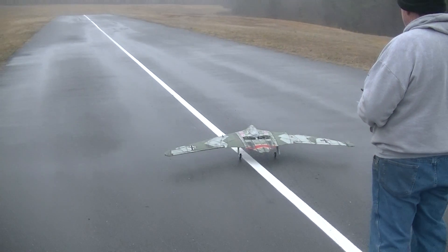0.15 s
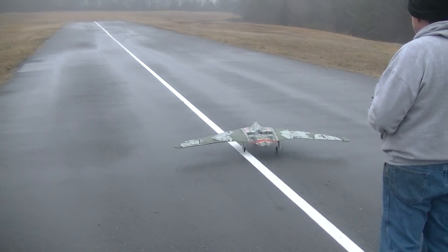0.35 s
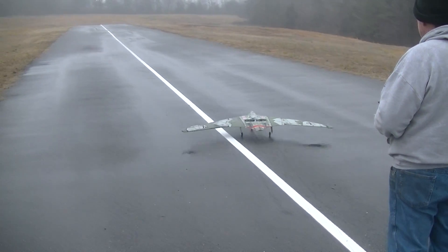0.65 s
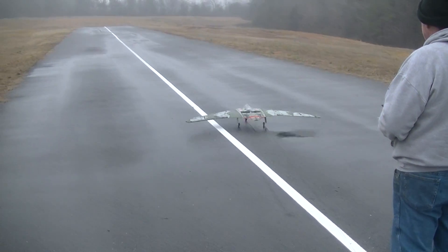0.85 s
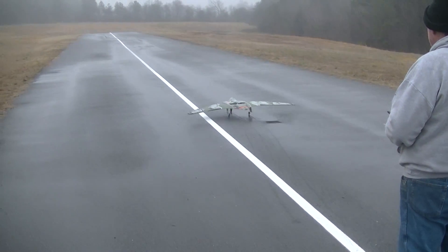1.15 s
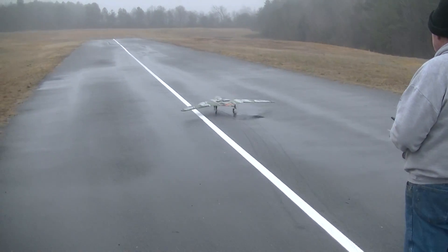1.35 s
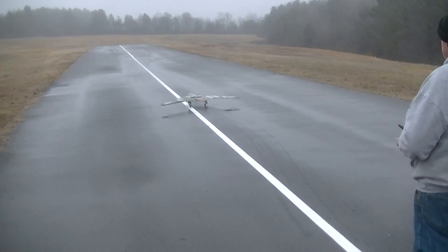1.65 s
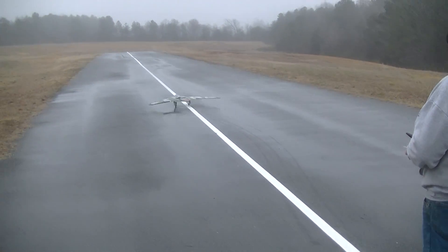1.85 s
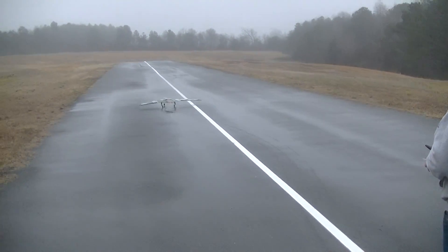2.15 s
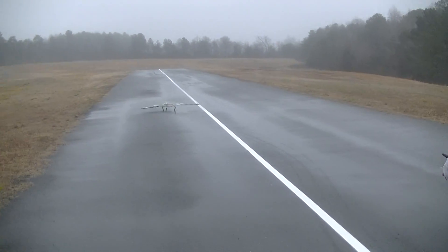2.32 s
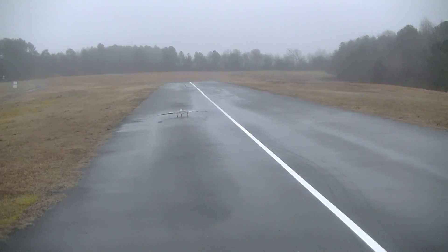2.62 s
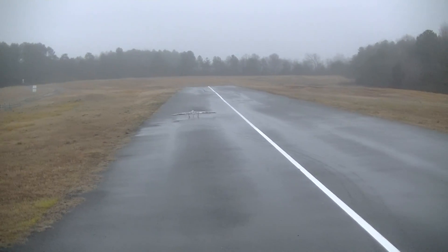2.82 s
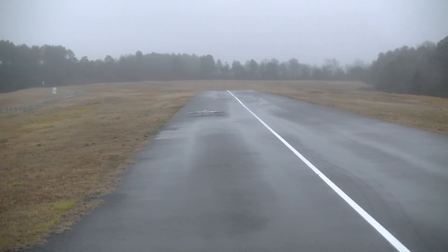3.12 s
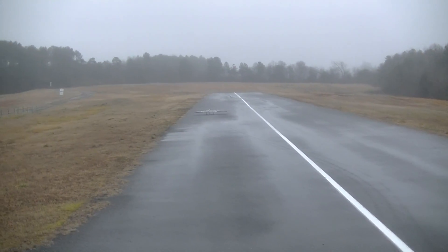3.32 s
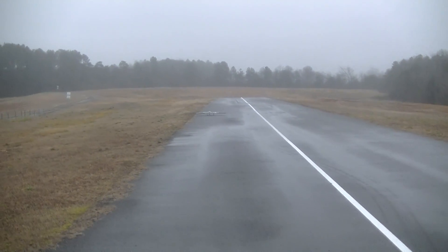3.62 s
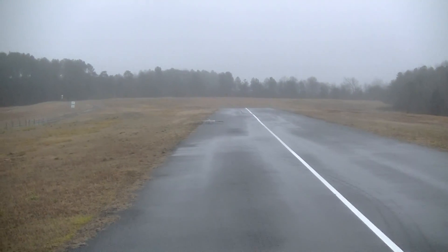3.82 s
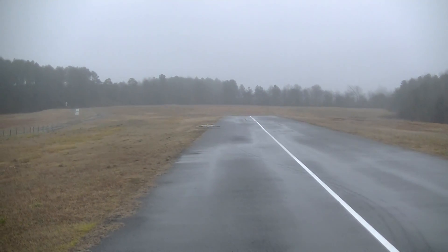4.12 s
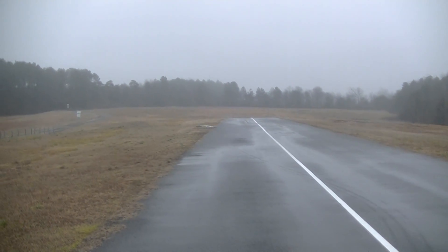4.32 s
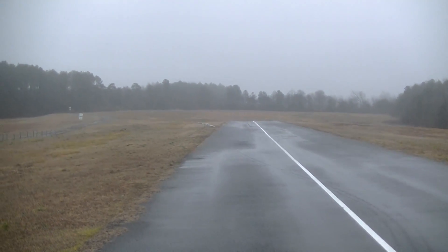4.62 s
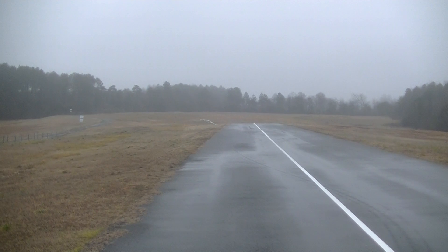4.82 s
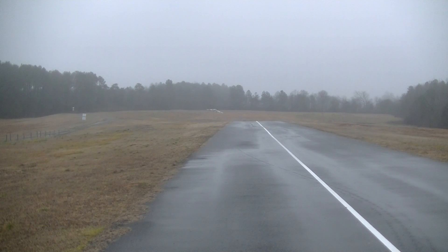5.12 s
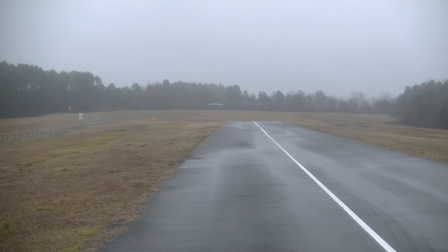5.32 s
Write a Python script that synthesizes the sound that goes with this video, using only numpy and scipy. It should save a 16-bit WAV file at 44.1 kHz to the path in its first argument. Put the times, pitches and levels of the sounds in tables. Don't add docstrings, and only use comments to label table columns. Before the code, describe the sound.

Shrill electric fan whine with rushing air jumps up in pitch, steadies, dulls and recedes across a quiet open field, ending after a tiny crack.

```python
import sys
import numpy as np
from scipy import signal
from scipy.fft import rfft, irfft, next_fast_len
from scipy.io import wavfile
from scipy.ndimage import uniform_filter1d, map_coordinates

SR = 44100
rng = np.random.default_rng(int(sys.argv[2]) if len(sys.argv) > 2 else 0)


def invert_db(level):
    return 10 ** (np.asarray(level, dtype=float) / 20)


def waveform_to_disk(signal):
    frames = np.transpose(np.atleast_2d(signal))
    scaled = np.clip(frames, -1, 1) * 32767
    samples = np.round(scaled).astype(np.int16)
    wavfile.write(sys.argv[1], SR, samples)


N = 240913
STEP = 16

# time in seconds, shaft turns in Hz.
SHAFT_HZ = [(0, 203.4), (.13, 207.5), (.7, 207.8), (.76, 219.7), (.83, 225.4), (.9, 223.6), (1.01, 209.8),
            (1.09, 214), (1.14, 218.8), (1.22, 240.5), (1.3, 244.6), (1.4, 239), (1.51, 252.7),
            (1.6, 253.7), (2.1, 251.8), (3, 247.9), (4, 246.4), (5.46, 244.8)]
# time in seconds, carry in dB, bass lost to ground echo in dB,
# treble lost to air and heading in dB.
PATH_DB = [(0, -22.5, 22, 9.5), (.3, -25, 18.5, 4.5), (.6, -30, 14.5, -1.5), (.9, -29.5, 7.5, 1),
           (1.05, -25.5, 14, 9), (1.5, -26.5, 9, 7), (1.7, -27.5, 8, 7), (2.1, -25.5, 11, 7),
           (2.4, -25.5, 13, 11), (2.7, -28.5, 12, 17), (3, -33.5, 9.5, 22.5), (3.4, -39.5, 4.5, 20),
           (3.75, -37.5, 5.5, 16), (4.05, -33.5, 12, 18), (4.5, -40, 10.5, 17), (4.8, -37, 15.5, 18),
           (5.1, -29, 27, 23), (5.46, -38, 12.5, 17)]
PATH_CORNERS_HZ = [1170, 2670, 9900]
# shaft multiple, level in dB.
NEAR_ORDERS_DB = [(1, -25.5), (2, -59.5), (3, -24.5), (4, -9), (5, -37), (6, -28), (7, -26), (8, -7),
                  (9, -41), (10, -18), (11, -25), (12, -10.5), (13, -2.5), (14, -4), (15, -10), (16, -9),
                  (17, -37.5), (18, -15), (19, -10.5), (20, -7.5), (21, -12), (22, -22), (23, -34),
                  (24, -7), (25, -32), (26, -7), (27, -16), (28, -3), (29, -25), (30, -11.5)]
# shaft multiple, level in dB.
FAR_ORDERS_DB = [(1, -24.5), (2, -34.5), (3, -42), (4, -15), (5, -55), (6, -22), (7, -34), (8, 0), (9, -29),
                 (10, -16.5), (11, -25), (12, -9.5), (13, -44), (14, -26), (15, -29), (16, -9), (17, -44),
                 (18, -34), (19, -18.5), (20, -11), (21, -41), (22, -25.5), (23, -30), (24, -12), (25, -37),
                 (26, -25.5), (27, -47), (28, -21), (29, -28), (30, -23)]
# shaft multiple, near level in dB, far level in dB.
UPPER_ORDERS_DB = [(32, -11, -30), (34, -24, -40), (36, -22, -34), (38, -28, -46), (40, -19, -36),
                   (42, -17, -43), (44, -18, -36), (46, -27, -48), (48, -29, -42), (50, -32, -50),
                   (52, -20, -45), (54, -27, -52), (56, -21, -50), (60, -30, -52)]
# shaft multiple, near level in dB, far
# level in dB.
MAGNET_BEATS_DB = [(3.5, -60, -24.5), (19.5, -17, -27), (58, -27, -54)]
# time in seconds, share of the far pattern (0-1),
# smear by turbulent air (ratio), extra haze on the high orders (ratio).
TURNING = [(0, 0, .26, 0), (.7, .1, .32, .05), (1.2, .5, .5, .15), (1.6, 1, .5, 0), (2.5, 1, .6, 0),
           (3, 1, .65, .2), (3.5, 1, .7, .6), (4.5, 1, .95, .7), (5.46, 1, 1.2, .7)]
# time in seconds, blade pass in dB, its 2nd harmonic in dB.
BLADE_LOAD_DB = [(0, -32, -35), (.3, -38, -35), (.6, -50, -42.5), (.7, -44, -34.5), (.77, -24.5, -36.5),
                 (.92, -26, -34.5), (1.04, -37, -30.5), (1.16, -26.5, -36.5), (1.3, -33, -30.5),
                 (1.5, -33, -23.5), (2.1, -41, -20.5), (2.4, -39, -20), (2.8, -37, -22.5),
                 (3.06, -39, -28.5), (3.5, -39.5, -35), (4.1, -38.5, -30.5), (4.45, -40, -39.5),
                 (5.2, -39.5, -30.5)]
# time in seconds, shaft multiple, change in
# dB, half length in seconds.
SINGING_DB = [(0.12, 14, 5, 0.11), (0.198, 20, 2, 0.078), (0.84, 28, 4, 0.056), (0.98, 20, 6.5, 0.14),
              (5.38, 16, -8, 0.14), (1.59, 16, -6, 0.12), (2.14, 16, 1.5, 0.43), (1.49, 12, 5.5, 0.1),
              (2.47, 24, 2.5, 0.33), (0.98, 42, -12, .2), (1.3, 56, -15, .2), (3.85, 20, -6, 0.35),
              (0.86, 24, 8, .09), (1.172, 24, 13, 0.02), (1.16, 16, 12, 0.068), (1.23, 20, 6, 0.087),
              (1.32, 16, -2.5, 0.17), (1.424, 24, 6.5, 0.05), (1.41, 20, 9.5, 0.08), (2, 20, -6.5, 0.4),
              (2.683, 16, 3.5, 0.19), (1.4, 8, -5.5, 0.02), (4.4, 1, -2.5, 0.98), (3.5, 16, -4, 0.3),
              (4.096, 16, -5, 0.078), (4.93, 16, 5.5, 0.33), (5.397, 20, 1, 0.071), (1.35, 22, 15, 0.22),
              (1.4, 18, 6, .15), (0.92, 32, -12, 0.18), (0.89, 44, -17, 0.23), (2.3, 32, 11, 0.39),
              (1.9, 10, 5.5, 0.54), (1.16, 15, 9.5, 0.16), (.25, 11, 13, 0.25), (5.38, 12, -4, 0.087),
              (5.31, 8, -3.5, 0.036), (2.8, 14, 8, 0.31), (0.53, 16, 8, 0.14), (1, 27, -8, .3),
              (0.58, 19, -10, 0.24), (.78, 18, -11, .1), (1.95, 28, 7.5, 0.43), (3, 12, 2, 0.086),
              (1.8, 12, -12, 0.048), (2.7, 16, 1, 0.078), (4.9, 1, -16, .12), (1.65, 1, 2.5, 0.43),
              (4.6, 4, -8, 0.018),
              (.975, 19.5, 17, .055), (1.02, 19, -8, .1), (1.0, 28, -4, .1), (1.57, 12, -3, .17),
               (.12, 13, -3, .15), (2.0, 16, 2, .3), (1.85, 20, 3, .3), (1.1, 52, 4, .1), (1.25, 32, 5, .1),
               (1.03, 20, -7, .06), (1.0, 24, 4, .025), (1.07, 24, 6, .03), (1.125, 24, 6, .02),
               (1.2, 24, -6, .014), (1.235, 24, 4, .025), (1.31, 24, 5, .035), (1.2, 20, -7, .016),
               (1.28, 20, -6, .01), (1.41, 20, -6, .012), (.8, 52, 4, .1), (.8, 40, 4, .08),
               (1.3, 44, 3, .15), (1.0, 48, 4, .3), (.12, 12, -4, .12), (.02, 14, 3, .04), (4.95, 6, 5, .5),
               (3.4, 6, 2, .5), (2.1, 52, 4, .7), (2.1, 56, 5, .7), (.55, 38, -6, .3)]
# frequency in Hz, density in dB per Hz.
ROAR_DB = [(100, -42), (200, -69), (375, -24.5), (950, -8), (1120, -5), (1300, -10.5), (1500, -4.5),
           (1760, -13.5), (2090, -0.5), (2300, -6.5), (3070, -10), (4270, -8), (6070, -7), (7000, -15),
           (9000, -20.5), (12000, -27.5), (15800, -28.5)]
# time in seconds, change in dB, half length in seconds.
GUSTS_DB = [(0.006, 1, 0.0091), (0.12, 1.5, 0.0082), (0.164, -1, 0.0068), (0.2, 2, 0.015),
            (0.242, -0.4, 0.028), (0.54, 0, 0.01), (0.651, 2.5, 0.0076), (0.66, -1.1, 0.05),
            (0.707, -2, 0.0074), (0.755, -0.3, 0.035), (0.852, -1.5, 0.016), (0.993, 2.5, 0.016),
            (1.034, -2.5, 0.016), (1.098, -2, 0.01), (1.126, 2, 0.007), (1.138, 2, 0.021),
            (1.17, 3, 0.0098), (1.188, -1.5, 0.012), (1.24, 2.5, 0.031), (1.295, 4.5, 0.0068),
            (1.32, 0, 0.016), (1.348, -2.5, 0.0064), (1.394, -1, 0.016), (1.434, 4, 0.0082),
            (1.487, 0.5, 0.011), (1.544, -2, 0.044), (1.642, -5, 0.0058), (1.743, 0, 0.0068),
            (1.787, 2.5, 0.023), (1.85, 3.5, 0.019), (1.89, -2.5, 0.007), (1.906, 1.5, 0.007),
            (1.91, -4, 0.024), (1.923, -2, 0.007), (1.945, 2.5, 0.007), (1.984, 1, 0.0083),
            (2.035, -0.5, 0.024), (2.133, -3, 0.033), (2.175, -4.5, 0.0067), (2.196, 1.2, 0.0069),
            (2.244, 2.5, 0.0072), (2.27, -3, 0.013), (2.328, 4.5, 0.0045), (2.362, -5.5, 0.014),
            (2.434, -1, 0.0073), (2.45, 3, 0.0072), (2.483, -2, 0.007), (2.53, 2.2, 0.012),
            (2.569, -3.5, 0.005), (2.596, 4, 0.005), (2.629, -4.5, 0.0047), (2.661, -3, 0.0065),
            (2.677, 1, 0.007), (2.729, 1.5, 0.041), (2.766, 1, 0.0064), (2.828, -2.5, 0.025),
            (2.869, -4, 0.0092), (2.905, -2, 0.0064), (2.94, -2, 0.0068), (3.028, 1.5, 0.007),
                (3.055, -5.5, 0.01), (3.087, -2, 0.0069), (3.205, 1.5, 0.035), (3.298, 2.5, 0.054),
                (3.301, -3, 0.0064), (3.334, 4.5, 0.0064), (3.374, -4, 0.007), (3.386, 5.5, 0.009),
                (3.426, 2.5, 0.016), (3.457, 0, 0.0068), (3.495, -3, 0.038), (3.493, 6, 0.0071),
                (3.81, -3, 0.007), (3.897, 4.5, 0.0067), (3.965, 2.5, 0.04), (4.063, 3.5, 0.0069),
                (4.094, 6.5, 0.0058), (4.102, -5, 0.0068), (4.186, 7.5, 0.006), (4.228, -1.0, 0.054),
                (4.302, -2.5, 0.0067), (4.325, 2, 0.016), (4.411, 0.5, 0.008), (4.468, -0.5, 0.021),
                (4.511, 3, 0.007), (4.576, 3, 0.006), (4.737, 5.5, 0.0059), (4.754, -3, 0.05),
                (4.816, -2, 0.0056), (4.87, 1.7, 0.007), (4.948, 1.7, 0.035), (5.1, 4, 0.0063),
                (5.136, 5, 0.0077), (5.147, -5, 0.0067), (5.188, 5.5, 0.0071), (5.207, -0.5, 0.05),
                (5.226, 1.5, 0.011), (5.26, 1.5, 0.016), (5.345, 0.5, 0.019), (5.392, -4, 0.007)]
# time in seconds, share (ratio).
FLUTTER_SHARE = [(0, .55), (1, .6), (1.15, 1.35), (1.6, 1.15), (2.8, 1.1), (3.2, .9), (5.46, .9)]
# time in seconds, half length in seconds, frequency in Hz, change in dB.
EDDIES_DB = [(0.51, 0.35, 860, 6), (1.95, .15, 1040, 1), (4.7, 0.14, 1200, 2), (4, .4, 4020, 1),
             (2.34, 0.22, 5100, -1.5), (0.398, 0.29, 1100, -3), (0.72, 0.47, 5100, 5),
             (1.32, 0.17, 13000, 3.5), (1.625, 0.14, 5700, 5), (2.011, 0.04, 6200, 2.5),
             (2.898, 0.14, 12900, 6.5), (3.703, 0.057, 9500, 6.5), (4.932, .1, 9500, 7),
             (4.7, 0.12, 1560, -5.5), (1.308, 0.082, 5350, 5), (2.43, 0.21, 11300, 9),
             (2.85, 0.053, 4800, 2), (3.5, 0.043, 5525, -5.5), (3.745, 0.12, 5170, 2),
             (4.353, 0.044, 5120, 8), (4.95, 0.19, 5440, 7.5), (5.222, 0.053, 2500, 4),
             (5.226, 0.087, 5200, -7.5), (5.42, 0.098, 5000, 8.5)]
# time in seconds, peak in dB, ring in Hz, t60 in seconds.
STRIKE_RINGS = [(5.2619, -18, 5500, .004), (5.2627, -1.5, 5900, .003), (5.2628, -8, 4500, .004),
                (5.2627, -14, 3500, .008), (5.2629, -10, 2350, .018), (5.2655, -8, 2450, .009),
                (5.2643, -13, 3350, .012), (5.2650, -25, 650, .04), (5.2660, -10, 6200, .005),
                (5.2651, -9, 1400, .01), (5.2645, -22, 870, .04), (5.2705, -23, 2300, .03),
                (5.2730, -23, 950, .02), (5.2790, -28, 780, .03), (5.2645, -33, 450, .015),
                (5.2760, -39, 480, .07), (5.2670, -45, 250, .07), (5.2815, -27, 2700, .012)]
# time in seconds, hum in Hz, level in dB.
TYRE_HUM = [(0, 101, -112), (2.7, 114.4, -84), (3.15, 120.2, -72), (3.6, 139.3, -75), (4, 150, -63),
            (4.32, 162.4, -67), (4.4, 169.7, -93.5), (5.46, 168.7, -99)]
# frequency in Hz, density in dB per Hz.
FIELD_DB = [(13, -41), (22, -19), (140, -10.5), (240, -6), (318, -7.5), (401, -10.5), (491, -3), (900, 0),
            (1170, -38), (1980, -120)]
# frequency in Hz, width in Hz, gain in dB.
PEAKS_GAPS_DB = [(3705, 303, -6), (3984, 120, 3), (4360, 76, -4.5), (4570, 420, 1), (5930, 390, 2),
                 (7890, 88, -23), (8840, 150, 3), (10000, 380, -4), (10930, 1680, 6), (8400, 56, -15),
                 (9600, 60, -8), (12250, 80, -9), (15200, 170, -17)]
# frequency in Hz, density in dB per Hz.
HISS_DB = [(3000, -26), (6500, 3), (8000, -3), (11000, -4), (13000, -15), (15800, -10)]
# frequency in Hz, left over right in dB.
LEFT_DB = [(60, 0), (210, .8), (500, 1), (1170, 2), (1790, 6), (2740, 7), (4190, 8.3), (6410, 4),
           (9810, 4.6), (15000, 4.3)]
# frequency in Hz, lead of the left port in radians.
LEAD_RAD = [(60, .1), (500, .3), (1460, .5), (3100, .45), (3700, .9), (4310, .4), (6720, .3), (7400, 1.2),
            (8440, .7), (9560, .4), (10700, .7), (15500, .7)]
# frequency in Hz, left-right correlation (-1 to 1).
ALIKE = [(60, .96), (200, .99), (1000, .99), (4000, .97), (7000, .93), (10000, .9), (14000, .87)]

FOURTH_NEAR_DB, FOURTH_FAR_DB = -2.5, -12
UPPER_DB, UPPER_FAR_DB = 1, 1
LISTED_GUSTS, SMALL_GUSTS = 0.93, 0.45
EDDY_OCTAVES = 0.44
STUMBLE_S, SAG_HZ, RECOVER_S = 5.266, 15, .06
DIP_DB, DIP_S, BLADE_DIP_S = 7.5, .028, .042


def unit(x):
    return x / np.sqrt(np.mean(np.abs(x) ** 2) + 1e-20)


def along(points, hz):
    point_hz, value = np.transpose(points)
    return np.interp(np.log(hz + 1), np.log(point_hz + 1), value)


def curves(rows, t):
    row_s, *columns = np.transpose(rows)
    return np.array([np.interp(t, row_s, column) for column in columns])


def wobble(rate_hz):
    knots = rng.standard_normal(int(N * 600 / SR) + 4)
    place = np.arange(0, N, STEP) * min(rate_hz, 600) / SR
    return unit(map_coordinates(knots, [place], order=2))


def filtered(x, response):
    size = next_fast_len(N + SR // 4)
    return irfft(rfft(x, size) * response(np.fft.rfftfreq(size, 1 / SR)), size)[..., :N]


def bump(x, centre, half):
    return np.exp(-((x - centre) / half) ** 2)


def stumble(t, recover_s):
    return (t > STUMBLE_S) * bump(t, STUMBLE_S, recover_s)


def field():
    murmur = lambda hz: invert_db(along(FIELD_DB, hz)) / (1 + (30 / (hz + 1)) ** 4)
    return invert_db(-53.0) * unit(filtered(rng.standard_normal((2, N)), murmur))


def wheels(t):
    clock_s = np.arange(N) / SR
    hz, db = curves(TYRE_HUM, clock_s)
    uneven_db = np.interp(clock_s, t, 2.4 * wobble(14))
    return invert_db(db + 1.5 + uneven_db) * np.sin(2 * np.pi * np.cumsum(hz) / SR)


def strike():
    out, t = np.zeros(N + SR), np.arange(SR // 10) / SR
    for start_s, peak_db, hz, t60_s in STRIKE_RINGS:
        ring = np.sin(2 * np.pi * hz * t) + 0.43 * np.diff(rng.standard_normal(len(t) + 1))
        onset = 1 - np.exp(-t / .0001)
        out[round(start_s * SR):][:len(t)] += invert_db(peak_db - 60 * t / t60_s) * ring * onset
    return filtered(out[:N], lambda hz: 1 / (1 + (170 / (hz + 1)) ** 6) / (1 + (hz / 6900) ** 4))


def path_db(t, hz):
    carry_db, bass_db, treble_db = curves(PATH_DB, t)
    low_hz, middle_hz, top_hz = PATH_CORNERS_HZ
    lows = np.clip(np.log(middle_hz / (hz + 1)) / np.log(middle_hz / low_hz), 0, 1)
    highs = np.clip((hz - middle_hz) / (top_hz - middle_hz), 0, 1)
    air_db = -1.5 * t * np.clip(hz / top_hz - 1, 0, 1)
    octave = np.log2(hz + 1)
    focus_db = sum(db * bump(t, at_s, half_s) * bump(octave, np.log2(at_hz), EDDY_OCTAVES)
                   for at_s, half_s, at_hz, db in EDDIES_DB)
    dip_db = DIP_DB * stumble(t, DIP_S) * (1 - .8 * lows + 1.3 * highs)
    return carry_db - bass_db * lows - treble_db * highs + air_db + focus_db - dip_db


def gusts(t):
    db = 1.7 * wobble(70) + 1.4 * wobble(110)
    db = curves(FLUTTER_SHARE, t)[0] * (db - uniform_filter1d(db, size=140))
    db = db - .1 * db ** 2 + .4
    listed_db = sum(change_db * bump(t, at_s, half_s)
                    for at_s, change_db, half_s in GUSTS_DB)
    return SMALL_GUSTS * db + LISTED_GUSTS * listed_db


def shaft_speed(t):
    throttle_hz = uniform_filter1d(curves(SHAFT_HZ, t)[0], size=90)
    sag_hz = SAG_HZ * (t > STUMBLE_S) * np.exp(-np.abs(t - STUMBLE_S) / RECOVER_S)
    return (throttle_hz - uniform_filter1d(sag_hz, size=30)) * (1 + 0.00064 * wobble(30.03))


def roar(turn, flutter_db):
    pulsing = 1 + .25 * np.cos(turn) + .5 * np.cos(2 * turn) + .45 * np.cos(4 * turn)
    hz, t, z = signal.stft(unit(pulsing * rng.standard_normal((2, N))), SR, nperseg=512)
    patches = rng.standard_normal(z.shape[1:])
    patches = unit(uniform_filter1d(uniform_filter1d(patches, 8, 0), 6, 1))
    hz = hz[:, None]
    flutter = np.interp(t, np.arange(N) / SR, flutter_db) * np.clip(hz / 5000, 0, .7)
    colour_db = along(ROAR_DB, hz) + path_db(t, hz) - path_db(2.003, hz)
    gain = invert_db(colour_db - 12.0 + 0.76 * patches + flutter)
    return signal.istft(z * gain, SR, nperseg=512)[1][:, :N]


def blade_tones(t, far):
    strong = dict(zip((4, 8), curves(BLADE_LOAD_DB, t) - DIP_DB * stumble(t, BLADE_DIP_S)))
    strong[16] = strong[8] + (1 - far) * FOURTH_NEAR_DB + far * FOURTH_FAR_DB
    strong[2] = strong[4] - 28 + 8 * far
    strong[12] = (strong[8] + strong[16]) / 2 + 4 - 9 * far
    return strong


def tones(t, shaft_hz, turn, flutter_db):
    far, smear, haze = curves(TURNING, t)
    strong = blade_tones(t, far)
    orders = [(k, near, away) for (k, near), (_, away) in zip(NEAR_ORDERS_DB, FAR_ORDERS_DB)]
    total, clock_s = np.zeros(N), np.arange(N) / SR
    for k, near_db, far_db in orders + UPPER_ORDERS_DB + MAGNET_BEATS_DB:
        near_db = near_db - 27 - path_db(.35, k * 207.5)
        far_db = far_db - 22 - path_db(2., k * 252.)
        level_db = (1 - far) * near_db + far * far_db + path_db(t, k * shaft_hz)
        level_db = strong.get(k, level_db) + flutter_db * min(k / 7, 1.15)
        level_db = level_db + (UPPER_DB + far * UPPER_FAR_DB) * (k > 31)
        level_db += sum(db * bump(t, at_s, half_s)
                        for at_s, which, db, half_s in SINGING_DB if abs(which - k) < .25)
        slow = min(.03 + .012 * k, .5)
        fast = smear * min(.02 + .018 * k + .0006 * k * k, .9)
        fast = fast + haze * np.clip((k - 12) / (16 - 10 * far), 0, 1)
        eddy = 1 + slow * (wobble(60) + 1j * wobble(60)) + fast * (wobble(300) + 1j * wobble(300))
        eddy = invert_db(level_db) * eddy / np.sqrt(.5 + slow ** 2 + fast ** 2)
        spin = np.exp(1j * (k * turn + rng.uniform(0, 2 * np.pi)))
        total += (np.interp(clock_s, t, eddy) * spin).real
    return total


def ports(alike, unlike):
    angle_rad = lambda hz: np.arccos(np.clip(along(ALIKE, hz), -1, 1)) / 2
    mid = filtered(alike, lambda hz: np.cos(angle_rad(hz)))
    side = filtered(unlike, lambda hz: np.sin(angle_rad(hz)))
    return np.array([mid + side, mid - side])


def scene():
    t = np.arange(0, N, STEP) / SR
    shaft_hz = shaft_speed(t)
    turn = 2 * np.pi * np.cumsum(shaft_hz.repeat(STEP)[:N]) / SR
    flutter_db = gusts(t)
    murmur = field()
    duct = roar(turn, flutter_db.repeat(STEP)[:N])
    fan = tones(t, shaft_hz, turn, flutter_db)
    return ports(fan + duct[0] + wheels(t) + strike() + murmur[0], duct[1] + murmur[1])


def top_cut(x):
    return signal.sosfilt(signal.butter(12, 15910, fs=SR, output="sos"), x)


def record(dry):
    peaks_gaps_db = lambda hz: sum(db * bump(hz, at_hz, width_hz) for at_hz, width_hz, db in PEAKS_GAPS_DB)
    side = np.array([[.5], [-.5]])
    port_gain = lambda hz: invert_db(peaks_gaps_db(hz) + along(LEFT_DB, hz) * (side - 0.1655))
    port_phase = lambda hz: np.exp(1j * side * along(LEAD_RAD, hz))
    heard = filtered(dry, lambda hz: port_gain(hz) * port_phase(hz) * (hz < 15910))
    hiss = filtered(rng.standard_normal((2, N)), lambda hz: invert_db(along(HISS_DB, hz)) * (hz < 15800))
    heard += invert_db(-62.5) * unit(hiss)
    mix = heard / (1 + np.abs(heard / 1.9) ** 6) ** (1 / 6)
    return top_cut(mix)


dry = scene()
out = record(dry)
waveform_to_disk(out)
```